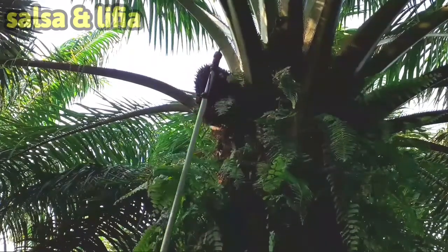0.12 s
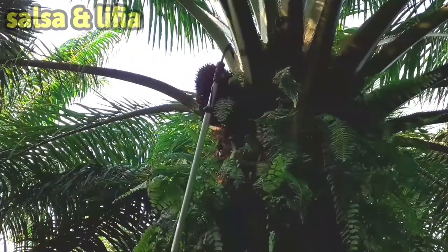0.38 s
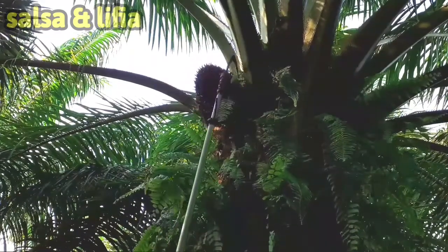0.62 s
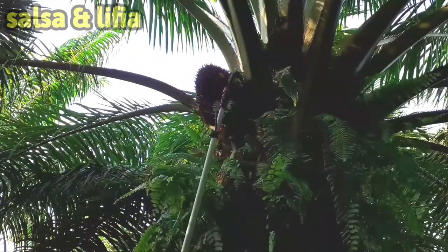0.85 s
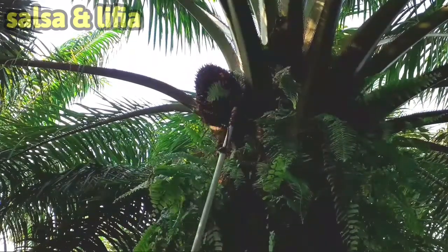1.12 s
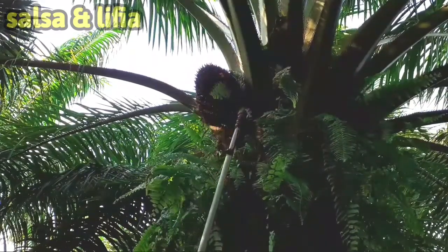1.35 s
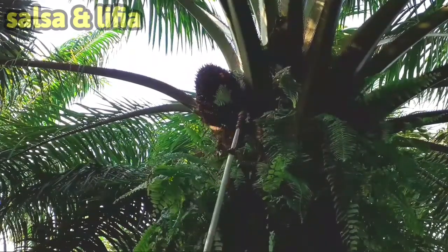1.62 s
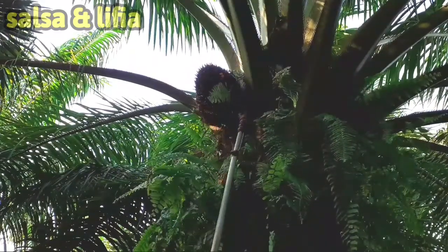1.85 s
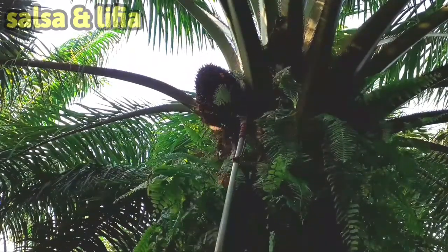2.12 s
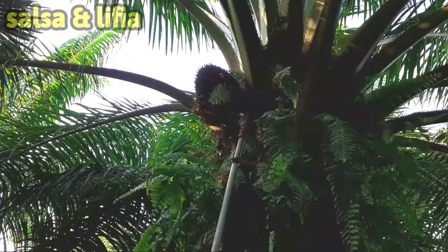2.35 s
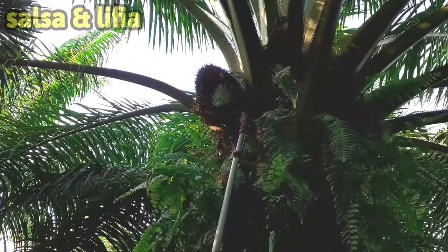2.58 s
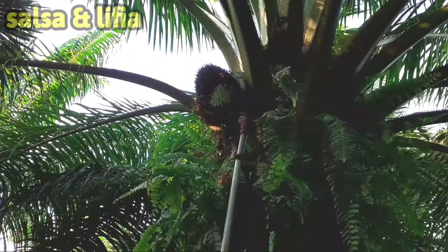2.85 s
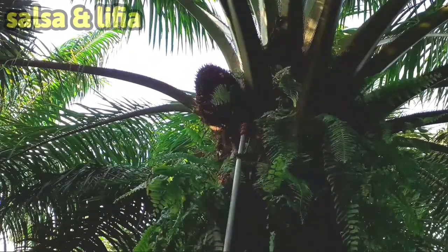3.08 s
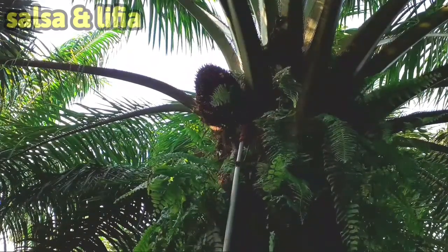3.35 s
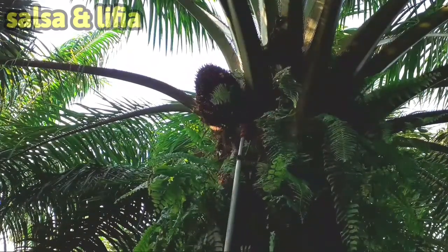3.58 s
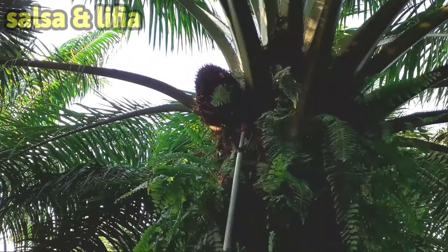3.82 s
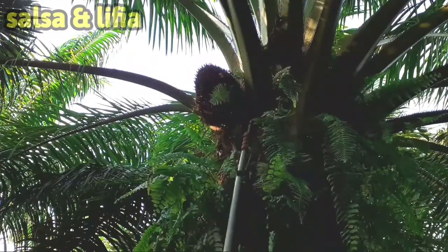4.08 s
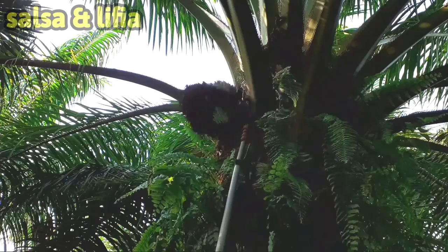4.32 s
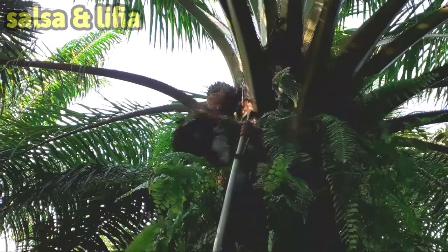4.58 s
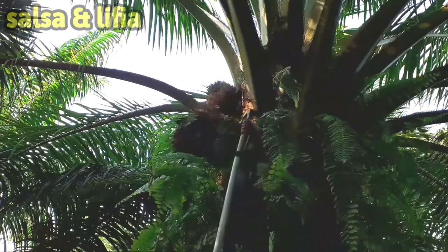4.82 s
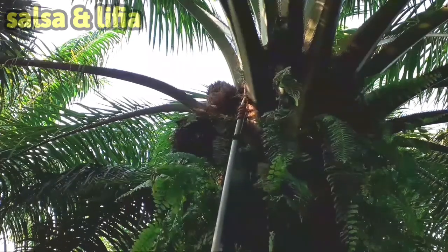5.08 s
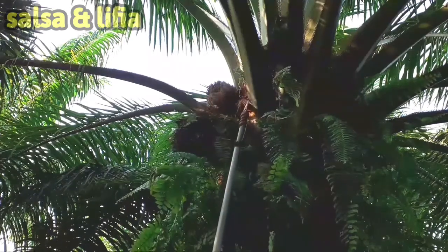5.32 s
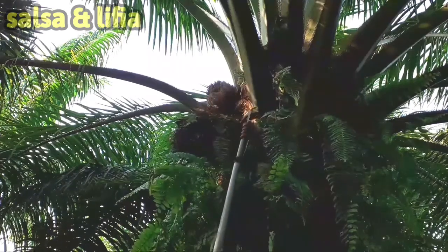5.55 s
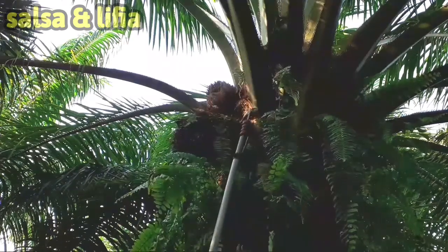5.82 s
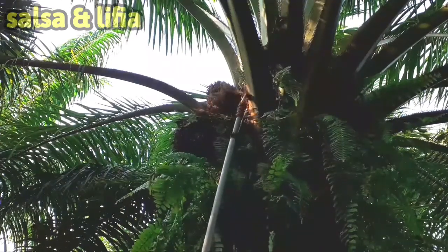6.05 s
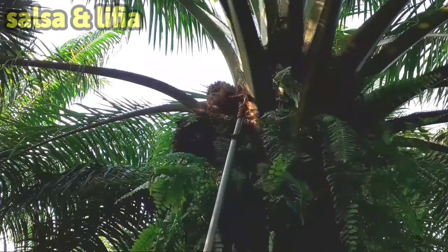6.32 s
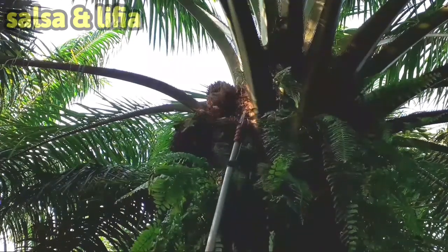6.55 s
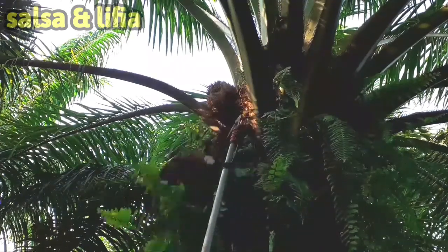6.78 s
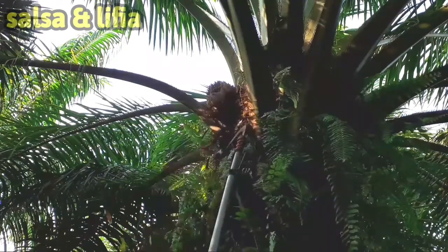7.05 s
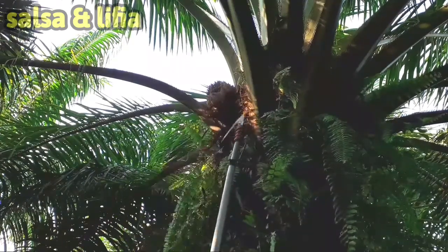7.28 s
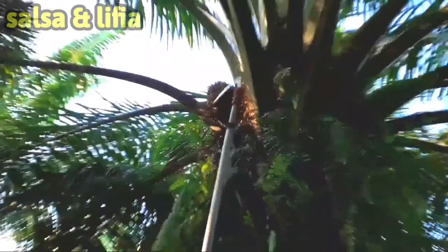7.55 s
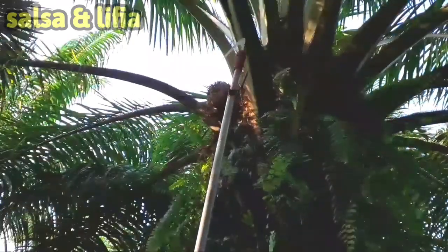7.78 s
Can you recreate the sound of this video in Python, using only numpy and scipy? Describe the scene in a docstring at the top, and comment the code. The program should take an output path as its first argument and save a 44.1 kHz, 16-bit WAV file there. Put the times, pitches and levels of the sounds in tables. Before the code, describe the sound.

High cicada buzzing, gently throbbing around four times a second, runs throughout over a faint far rumble with soft gusts. At 0 s a small click and leaf rustle open; until 2 s there are faint knocks, a tiny squeak and dry fibre ticks. A quiet short sawing tug comes at 2.2 s, then sparse rustles, snaps and taps. At 4.1 s a strong woody rasp rings the pole, with sharp knocks and a leafy swish to 4.6 s. Around 5 s come a jolt, knocks and a thin metallic squeak; at 5.5 s a crackling tug booms hollowly, followed by pole knocks and bright snaps near 6 s. A loud snap at 6.4 s precedes the strongest tug at 6.5 s. Fronds swish heavily from 6.7 s, peaking at 7.0 s; at 7.44 s the bunch lands with a short deep thud and leafy crash, fading into shivering foliage and one soft knock at 7.9 s.

```python
"""A click opens the scene; cicadas buzz all along in noisy resonances, over a far low rumble with gusts.
A hooked blade on a long metal pole works at a fruit bunch high in a palm: knocks, squeaks and snapping fibres.
From two seconds on each tug saws through fibre in dense clicks that ring the pole, and a deeper boom follows.
Fronds and ferns rustle as shaped noise, loudest towards the end, as the cut bunch comes down.
It thuds on the soil at 7.4 s as a few dying sines, and the foliage shivers on."""
import sys
import numpy as np
from scipy import signal
from scipy.io import wavfile

SR = 44100
rng = np.random.default_rng(int(sys.argv[2]) if len(sys.argv) > 2 else 0)


def inscribe(sig):
    """Save sig as 16-bit PCM at rate SR to the path in sys.argv[1].

    A 1-D sig is mono; a 2-D sig holds one channel per row.
    Samples are clipped to [-1, 1] before scaling.
    """
    pcm = np.round(np.clip(np.atleast_2d(sig).T, -1, 1) * 32767)
    wavfile.write(sys.argv[1], SR, pcm.astype(np.int16))


def invert_db(x):
    """Field ratio 10**(x/20) for x, a level in decibels (scalar or array-like)."""
    u = np.asarray(x, float) / 20
    return 10 ** u


N = 348875

# tugs of the blade: (start [s], fibre parts [s], fading to 1/e [s], sawing level [dB], pole boom level [dB])
TUGS = [(2.172, 2.227, 0.044, -32, -38.5), (4.064, 4.147, 0.0314, -25.5, -31.5),
        (4.458, 4.548, 0.0198, -42.5, -46.5), (5.461, 5.499, 0.025, -36.5, -42.5),
        (5.497, 5.55, 0.0632, -27.5, -29), (6.492, 6.552, 0.0506, -21.5, -24)]


def rms_one(x):
    return x / np.sqrt(np.mean(x ** 2) + 1e-20)


def lean(name):
    """Left and right gains that set a layer a little to one side."""
    # left minus right of each layer [dB]
    left_minus_right = {"pole": -2.5, "leaves": -1, "stems": -2.5, "ground": -4, "cicadas": -4.5, "air": -5}
    return invert_db(left_minus_right[name] * np.array([[0.5], [-0.5]]))


def at_hz(points, hz):
    """Reads a curve of (frequency, value) points along a logarithmic frequency axis."""
    point_hz, values = np.array(points).T
    return np.interp(np.log(hz), np.log(point_hz), values)


def drift(rate_hz):
    """Slow chance: noise through a double one-pole low-pass at a fortieth of the sample rate; spread 1."""
    r = np.exp(-2 * np.pi * rate_hz * 40 / SR)
    noise = rng.standard_normal(N // 40 + 2002)
    slow = signal.lfilter([1], [1, -2 * r, r * r], noise)[2000:]   # skip the settling
    return np.interp(np.arange(N) / 40, np.arange(len(slow)), rms_one(slow))


def band(x, low_hz, high_hz, order):
    """Butterworth band-pass."""
    return signal.sosfilt(signal.butter(order, [low_hz, high_hz], "band", fs=SR, output="sos"), x)


def resonate(x, hz, width_hz):
    """Two-pole resonance with gain 1 on top."""
    r = np.exp(-np.pi * width_hz / SR)
    zeros = np.array([1, 0, -1]) * (1 - r * r) / 2
    poles = [1, -2 * r * np.cos(2 * np.pi * hz / SR), r * r]
    return signal.lfilter(zeros, poles, x + 1e-18)


def crackle(per_s, spread_db, smooth, channels):
    """Random clicks of uneven size over a share of smooth noise."""
    shape = (channels, N)
    sizes = invert_db(spread_db * np.minimum(rng.exponential(1, shape), 4))
    signs = rng.choice([-1, 1], shape)
    struck = rng.random(shape) < per_s / SR
    return rms_one(sizes * signs * struck) + smooth * rng.standard_normal(shape)


def coloured(source, spectrum, patchy_db, width):
    """Half-octave bands of a four-channel source, each with its own level, flicker and likeness; rms 1."""
    # how alike left and right are: (frequency [Hz], likeness [0 to 1])
    likeness = [(60, 1), (300, 0.863), (1400, 0.082), (3100, 0.017), (15000, 0.092)]
    bottom, top = spectrum[0][0], spectrum[-1][0]
    edges = np.geomspace(bottom, top, round(2 * np.log2(top / bottom)) + 1)
    out = 0
    for k, (low, high) in enumerate(zip(edges, edges[1:])):
        centre = np.sqrt(low * high)
        mid, side = band(source[k % 2::2], low, high, 2)   # neighbouring bands use different channels
        alike = np.clip(at_hz(likeness, centre), 0, 1)
        gain = invert_db(at_hz(spectrum, centre) + patchy_db * drift(8.63))
        spread = width * np.sqrt(1 - alike) * side * [[1], [-1]]
        out = out + gain * (np.sqrt(1 + alike) * mid + spread)
    return rms_one(out)


def dying(s, rise, t60):
    """An envelope that swells from s and dies away."""
    t = np.maximum(np.arange(N) / SR - s, 0)
    return (1 - np.exp(-t / rise)) * invert_db(-60 * t / t60)


def pull(s, parts, fading):
    """The strain of one tug: a quick bite, a climb to 1 until the fibre parts, a drop and a rounded fading."""
    bite_s, bite_db, give_db = 0.00734, -7.5, -4   # bites below full strain, which drops as the fibre parts
    t = np.arange(N) / SR
    bite = 1 - np.exp(-np.maximum(t - s, 0) / bite_s)
    climb = bite * invert_db(bite_db * np.clip((parts - t) / (parts - s), 0, 1) ** 2)
    return np.where(t < parts, climb, invert_db(give_db) * np.exp(-((t - parts) / fading) ** 2))


def air():
    """Far rumble that swells with the gusts, and a faint steady hiss."""
    # spectrum of the air: (frequency [Hz], relative level [dB per Hz])
    air_spectrum = [(30, -24), (50, -4.5), (75, 1.5), (120, 6), (200, -7), (320, -1), (450, -21.5),
                    (700, -54), (1500, -28.5), (3000, -62.5), (6000, -20.5), (9000, -32.5), (16000, -35)]
    # wind and far rumble, heard against the median of the curve: (time [s], level [dB])
    gust_points = [(0.0, -64), (2.68, -62), (2.82, -57.5), (3.4, -63), (4.12, -61.5), (4.24, -59),
                   (5.23, -57), (5.52, -56), (6.3, -66.5), (6.8, -64.5), (7.4, -61)]
    sound = invert_db(-58.5) * coloured(rng.standard_normal((4, N)), air_spectrum, patchy_db=2.0, width=1.247)
    rumble = signal.sosfilt(signal.butter(1, 250, fs=SR, output="sos"), sound)
    hiss = sound - rumble
    gust_db = np.interp(np.arange(N) / SR, *np.transpose(gust_points))
    return hiss + rumble * invert_db(gust_db - np.median(gust_db))


def cicadas():
    """Buzzing noise in the tymbal resonances, throbbing a little over four times a second."""
    # tymbal resonances: (centre [Hz], width of each of two passes [Hz], level [dB])
    tymbals = [(4427, 468, -68.5), (5160, 566, -62), (6666, 420, -74)]
    out = 0
    for hz, width, db in tymbals:
        throb_hz = 4.4 * (1 + 0.1714 * drift(0.764))
        throb_db = 2.0 * np.sin(np.cumsum(2 * np.pi * throb_hz / SR)) + 0.67 * drift(0.24)
        buzz_hz = 170 * (1 + 0.1 * drift(6.43))
        buzz = 1 + 0.15 * np.sin(np.cumsum(2 * np.pi * buzz_hz / SR))
        song = resonate(resonate(rng.standard_normal((2, N)) * buzz, hz, width), hz, width)
        out = out + invert_db(db + throb_db) * rms_one(song)
    return out


def shaking():
    """Tugs, jolts and sways add up in power: the levels of leaves and of stems over time."""
    # leaves and stems at rest: one row each (level [dB])
    still_db = [
        [-85.5],
        [-94.5],
    ]
    # sudden jolts through the foliage: (start [s], leaf hiss level [dB], stems and debris level [dB], t60 [s])
    jolts = [(0.0, -59.5, -51.5, 0.386), (.045, -56, -62.5, 0.41), (.577, -63, -58.5, 0.263),
             (.803, -51.5, -56.5, 0.533), (2.127, -53, -54.5, 0.56), (2.905, -58.5, -66, 0.48),
             (4.977, -55.5, -45.5, 0.394), (5.025, -53, -59, 0.44), (5.721, -64, -52, 0.392),
             (6.019, -49, -50.5, 0.537), (6.357, -49.5, -61, 0.58), (7.283, -44.5, -50.5, 0.557),
             (7.438, -35, -37.5, 0.801)]
    # slower sways of fronds and ferns: (peak [s], leaf hiss level [dB], stems and debris level [dB],
    # last 6 dB up [s], first 6 dB down [s]); the sign of the last two makes no difference
    sways = [(.4, -63, -73, 0.34, 0.13), (1.02, -56, -69, 0.1016, 0.137), (1.58, -67.5, -82, 0.1446, .07),
             (1.75, -61, -70.5, 0.1, 0.0355), (1.9, -67, -88, 0.2, -0.03), (2.64, -72, -71, 0.0864, 0.08),
             (2.76, -64.5, -73, 0.12, 0.09), (3.0, -65.5, -72, -0.03, 0.19),
             (3.17, -54.5, -70, 0.05, 0.0528), (3.32, -62, -79.5, -0.01, 0.06),
             (3.77, -61, -76, 0.0769, 0.02), (4.04, -65.5, -78, 0.05, 0.35),
             (4.3, -50, -41.5, 0.0545, 0.1553), (4.552, -40, -45, 0.1, 0.0373),
             (4.85, -65, -66.5, 0.2039, .28), (5.299, -66, -64, 0.0977, 0.0437),
             (5.96, -60.5, -77.5, 0.14, .045), (6.66, -42, -43, 0.054, 0.0028),
             (6.82, -41, -40.5, 0.0446, 0.1), (7.01, -33.5, -35, 0.1322, 0.1122),
             (7.23, -44, -46.5, 0.061, 0.0591), (7.9, -62, -61.5, -0.03, 3.4)]
    hiss_below_boom_db, stems_below_saw_db = -3.5, -9.5   # what a tug shakes, against its own sounds
    settle_db, settle_t60_s = -7.5, 0.499   # foliage shivers on after a tug
    t = np.arange(N) / SR
    moves = []
    for s, parts, fading, saw_db, boom_db in TUGS:
        shape = pull(s, parts, fading) + invert_db(settle_db) * dying(parts, fading, settle_t60_s)
        moves.append((shape, boom_db + hiss_below_boom_db, saw_db + stems_below_saw_db))
    for s, hiss_db, stems_db, t60 in jolts:
        moves.append((dying(s, 0.00182, t60), hiss_db, stems_db))
    for peak, hiss_db, stems_db, up, down in sways:
        away = np.abs((t - peak) / np.where(t < peak, up, down))
        moves.append((invert_db(-6 * away ** 1.412), hiss_db, stems_db))
    power = sum((shape * invert_db([[hiss_db], [stems_db]])) ** 2 for shape, hiss_db, stems_db in moves)
    return np.sqrt(invert_db(still_db) ** 2 + power)


def foliage():
    """Leaflets hiss in fine grains; stems and falling debris patter lower."""
    # spectrum of the leaves: (frequency [Hz], relative level [dB per Hz])
    leaf_spectrum = [(1500, -9), (2500, -4), (3600, 2.5), (8000, 5), (10000, -0.5), (12500, 2.5),
                     (16500, -2.5)]
    # spectrum of stems and debris: (frequency [Hz], relative level [dB per Hz])
    stem_spectrum = [(71, -32), (120, -1.5), (210, -9.5), (336, 2.5), (438, -5), (1080, -8.5), (1460, -3),
                     (5000, -13.5), (6500, -67.5), (11000, -120)]
    hiss, patter = shaking()
    clumps = invert_db(1.0 * drift(20))   # leaves and stems flicker together
    leaf_grains = crackle(3000, 2.55, 1.0, channels=4) * clumps
    stem_grains = crackle(650, 4.0, 0.7, channels=4) * clumps
    leaves = coloured(leaf_grains, leaf_spectrum, patchy_db=0.23, width=1.0)
    stems = coloured(stem_grains, stem_spectrum, patchy_db=2.0, width=0.7)
    return hiss * leaves * lean("leaves") + patter * stems * lean("stems")


def squeaks():
    """Narrow noise: blade edge ringing, stems rubbing."""
    # short squeaks and rings: (start [s], centre [Hz], width of each of two passes [Hz], level [dB], t60 [s])
    rings = [(.47, 2260, 120, -63.5, 0.213), (4.965, 8600, 100, -48, 0.072),
             (5.025, 10050, 60, -57.5, 0.326), (5.77, 2130, 60.1, -48.5, 0.127),
             (5.95, 7170, 150, -50.5, 0.123), (6.025, 10300, 60, -48, 0.172), (6.03, 2300, 80, -49, 0.126),
             (7.872, 2970, 1530, -42.5, 0.044)]
    noise = rng.standard_normal(N)
    out = 0
    for s, hz, width, db, t60 in rings:
        tone = rms_one(resonate(resonate(noise, hz, width), hz, width))
        out = out + invert_db(db) * dying(s, 0.0553 * t60, t60) * tone
    return out


def snaps():
    """Dry fibres snap: a bright tick, then splintering that fades well below it."""
    # snapping fibres: (start [s], level before a common trim [dB])
    fibres = [(0.8051, -35.5), (0.939, -31.5), (0.9547, -33.5), (1.0324, -32), (1.113, -30),
              (1.1522, -37.5), (1.262, -43.5), (1.7386, -36), (2.1295, -34), (2.8073, -38.5), (2.9107, -45),
              (3.289, -43), (3.3428, -39), (3.62, -41.5), (3.7551, -34), (3.8137, -36.5), (5.025, -28),
              (5.2065, -34), (6.025, -23), (6.3621, -16.5), (6.8044, -18), (7.2865, -22.5)]
    push = 0
    for s, db in fibres:
        tick = dying(s, 0.0001, 0.00228)
        splintering = invert_db(-20.5) * dying(s, 0.00077, 0.138)
        push = push + invert_db(db - 2.5) * (tick + splintering)
    noise = rng.standard_normal(N) + 1.03 * rng.standard_normal((2, N))   # partly shared by left and right
    return rms_one(band(noise, 3200, 15500, 2)) * push


def pole(x):
    """The pole's resonances in parallel, with alternating signs."""
    # modes of the metal pole: (frequency [Hz], width [Hz], level [dB])
    pole_modes = [(544, 60, 1), (697.6, 94, 8.5), (801.4, 26.7, 13), (980, 36.8, 11), (1214.6, 64, 1.5),
                  (1602, 52, -1), (1924, 13, 2.5), (2440, 48, 4), (2855, 41, -22), (3115, 110, -16.5)]
    return sum((-1) ** k * invert_db(db) * resonate(x, hz, width) for k, (hz, width, db) in enumerate(pole_modes))


def click_and_knocks():
    """A scuff noise in short bursts rings wood and, more weakly, the pole, over a broad dry tick."""
    # the first row is a click that opens the scene, the others are the pole knocking and scuffing on wood:
    # (start [s], level [dB], t60 [s], centre [Hz])
    hits = [(.004, -41.5, 0.096, 808), (.06, -55.5, 0.079, 1300), (.578, -53.5, 0.117, 696),
            (.63, -62, 0.075, 700), (0.84, -51, 0.085, 747), (1.74, -50, 0.151, 1057),
            (1.77, -57.5, 0.236, 1090), (2.684, -45.5, 0.293, 314), (2.911, -49.5, 0.143, 473),
            (2.99, -56, 0.122, 1000), (3.048, -53, 0.074, 543), (3.191, -44.5, 0.123, 963),
            (4.179, -24.5, 0.055, 980), (4.19, -31, .05, 1500), (4.241, -35.5, 0.31, 672),
            (4.524, -35, 0.075, 710), (4.938, -52, 0.196, 785), (4.98, -32, 0.105, 450.4),
            (4.992, -35, 0.084, 1200), (5.029, -41.5, 0.157, 970), (5.142, -54.5, 0.085, 960),
            (5.299, -48, 0.137, 870), (5.645, -29, 0.098, 1220), (5.663, -26.5, 0.073, 980),
            (5.724, -30, 0.0562, 932), (5.937, -51, 0.117, 517), (5.973, -47.5, 0.113, 493),
            (6.021, -29.5, 0.1, 265.3), (6.632, -26, 0.0596, 1003), (6.672, -31, 0.108, 1095),
            (6.775, -34.5, 0.16, 920), (7.901, -43, 0.15, 418)]
    scuff = crackle(4000, 2.5, 0.8, channels=1)[0]
    metal = rms_one(pole(scuff))
    tick = rms_one(band(scuff, 220, 2100, 1))
    out = 0
    for s, db, t60, hz in hits:
        wood = rms_one(resonate(resonate(scuff, hz, 0.294 * hz), hz, 0.863 * hz))
        out = out + invert_db(db) * dying(s, 0.00055, t60) * (0.414 * wood + 0.183 * metal + 0.1583 * tick)
    return out


def thud():
    """The bunch lands: a rarefaction first, each mode swelling in over a millisecond or two."""
    # modes of soil and bunch: (frequency [Hz], level [dB], t60 [s], onset lag [s])
    soil_modes = [(59.9, -15.5, 0.253, 0.0039), (109, -1, 0.0678, 0.00617), (253.7, 2.5, 0.0178, 0.001075),
                  (593.4, -6, 0.0175, 0.001406)]
    thud_s = 7.4378
    t = np.arange(N) / SR - thud_s
    out = 0
    for hz, db, t60, lag in soil_modes:
        out = out - invert_db(db) * dying(thud_s + lag, 0.001215, t60) * np.sin(2 * np.pi * hz * (t - lag))
    rumble = rms_one(band(rng.standard_normal(N), 55, 400, 2))
    return out + invert_db(-31.0) * dying(thud_s, 0.0058, 0.407) * rumble


def splinters(clicks, low_hz, high_hz, cycles, tilt_db):
    """Every click rings a few cycles at one of 16 pitches; tilt_db per octave sets the higher ones' level."""
    dealt = rng.integers(0, 16, clicks.shape)
    out = 0
    for k, hz in enumerate(np.geomspace(low_hz, high_hz, num=16)):
        ringing = rms_one(resonate(clicks * (dealt == k), hz, 2.34 * hz / cycles))
        out = out + invert_db(tilt_db * np.log2(hz / low_hz)) * ringing
    return rms_one(out)


def sawing():
    """Fibres part in a dense chatter of woody splinters that drives the pole; its air column booms along."""
    boom_hz, boom_width_hz = 304.76, 25.9
    boom_lag_s = 0.008   # the air column builds up late
    saw, swell = 0, 0
    for s, parts, fading, saw_db, boom_db in TUGS:
        saw = saw + invert_db(saw_db) * pull(s, parts, fading)
        swell = swell + invert_db(boom_db) * pull(s + boom_lag_s, parts + boom_lag_s, fading)
    mid, side, low = crackle(3500, 4.17, 0.36, channels=3)
    wood = splinters(mid, 496, 3228, cycles=7.48, tilt_db=-4.0) + 0.533 * rms_one(pole(mid))
    wide = splinters(side, 900, 4500, cycles=9.0, tilt_db=1.0)
    column = rms_one(resonate(resonate(low, boom_hz, boom_width_hz), boom_hz, 10.0 * boom_width_hz))
    trunk = rms_one(resonate(resonate(low, 124, 40), 110, 60))   # the trunk answers lower
    return saw * rms_one(wood + 0.367 * wide * [[1], [-1]]) + swell * (column + 0.13 * trunk)


def scene():
    """All layers, each leaning to its own side."""
    background = air() * lean("air") + cicadas() * lean("cicadas")
    pole_side = (squeaks() + click_and_knocks() + sawing()) * lean("pole")
    return background + foliage() + snaps() * lean("leaves") + thud() * lean("ground") + pole_side


def band_limit(x):
    """A steep low-pass at the top of the band."""
    return signal.sosfilt(signal.butter(12, 16510, fs=SR, output="sos"), x)


def record(dry):
    """The microphones drop the deepest bass and the very top."""
    wet = signal.sosfilt(signal.butter(3, 51.4, "high", fs=SR, output="sos"), dry)
    wet = signal.sosfilt(signal.cheby2(12, 60, 16222.5, fs=SR, output="sos"), wet)   # 60 dB down from there
    return band_limit(wet)


dry = scene()
out = record(dry)
inscribe(out)
```